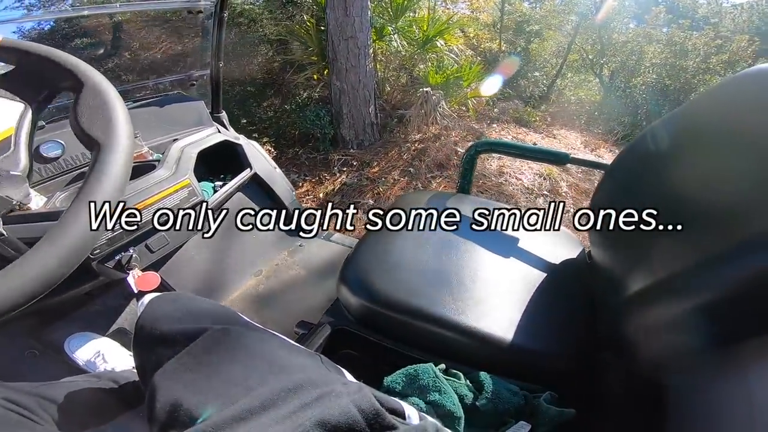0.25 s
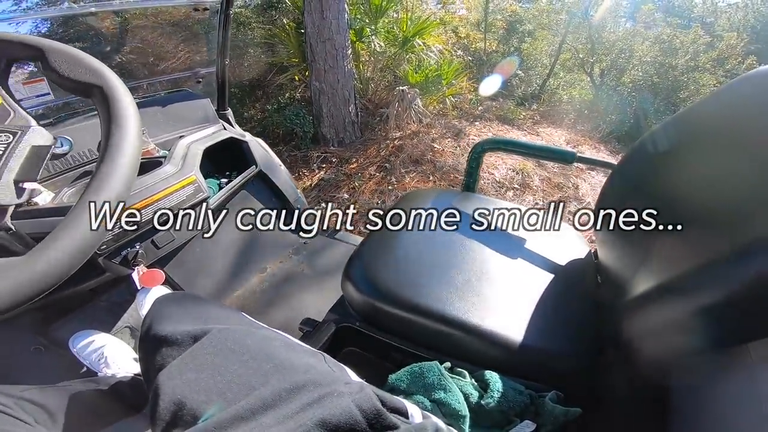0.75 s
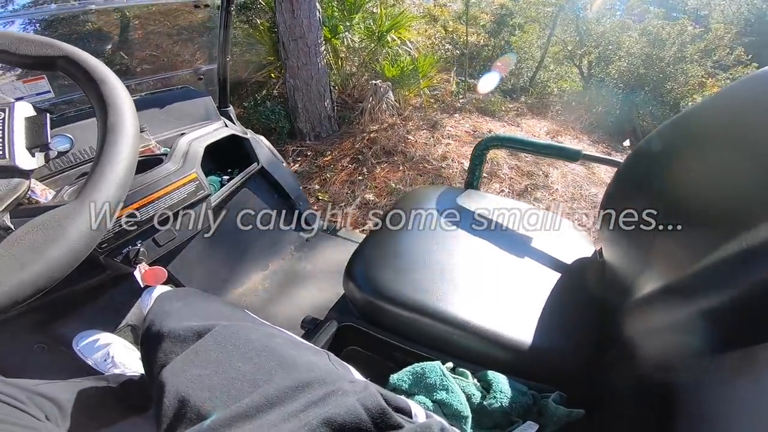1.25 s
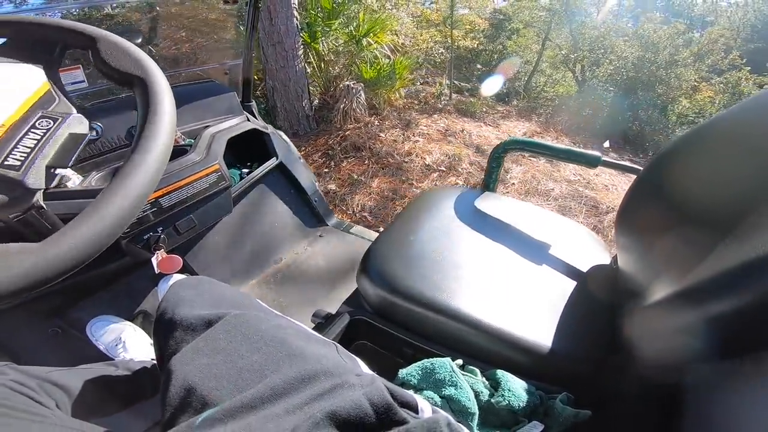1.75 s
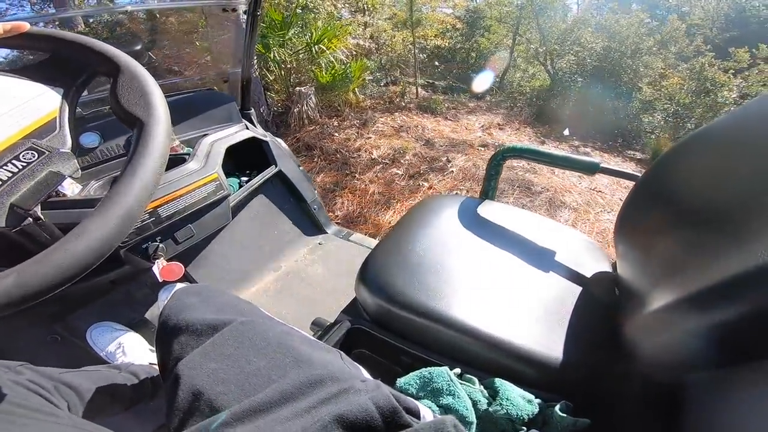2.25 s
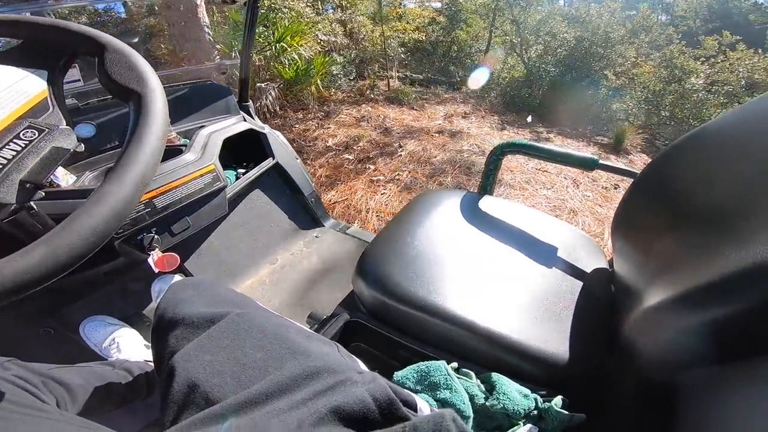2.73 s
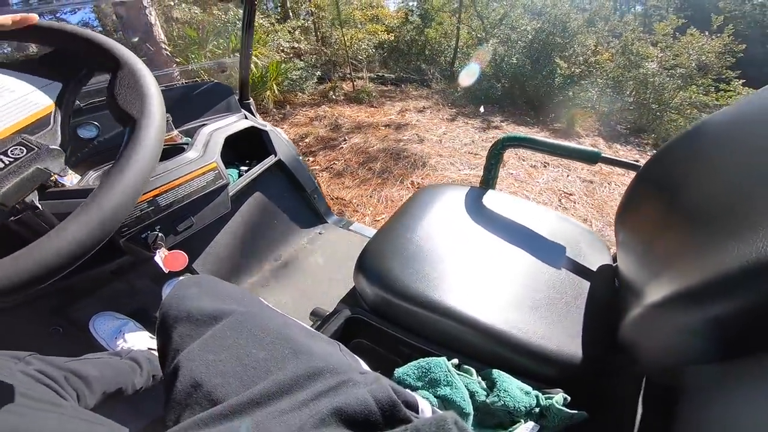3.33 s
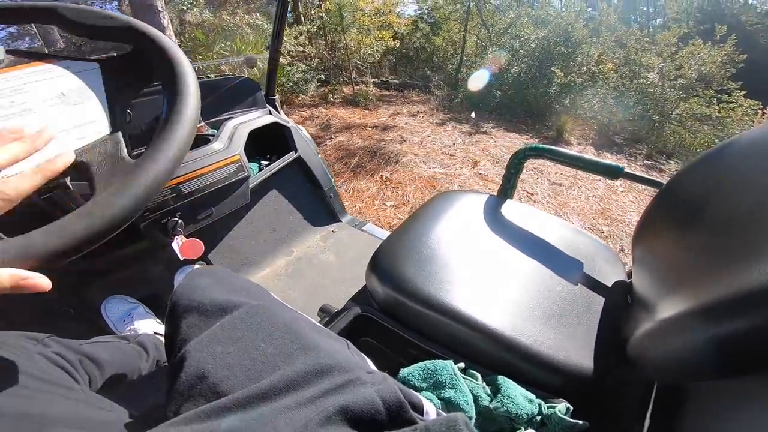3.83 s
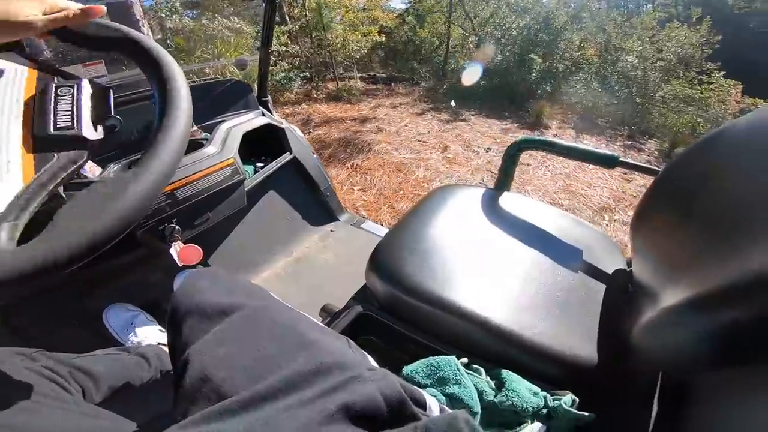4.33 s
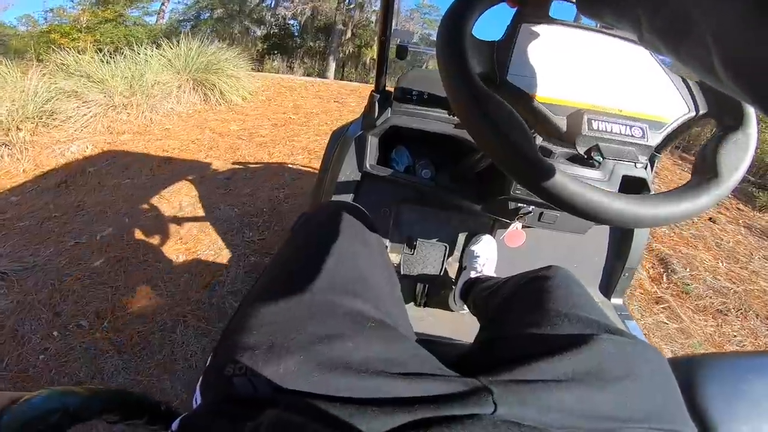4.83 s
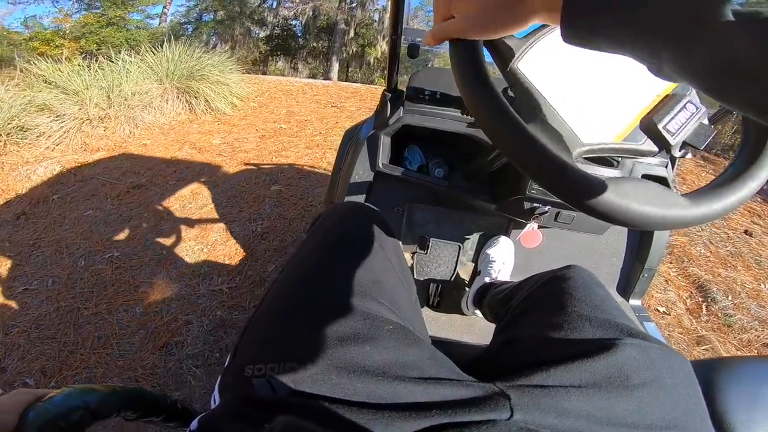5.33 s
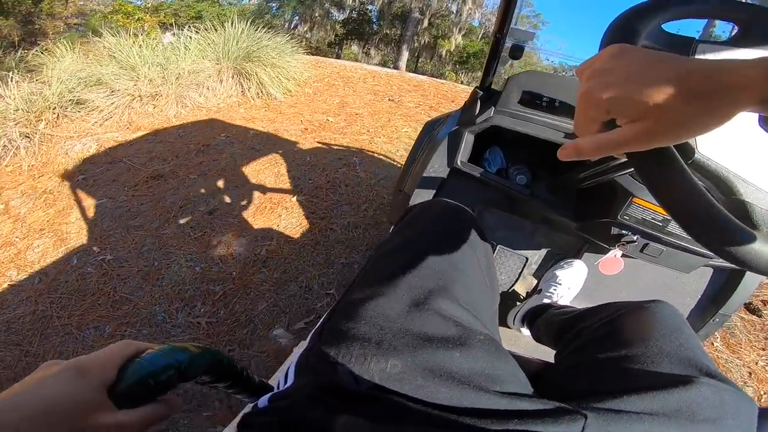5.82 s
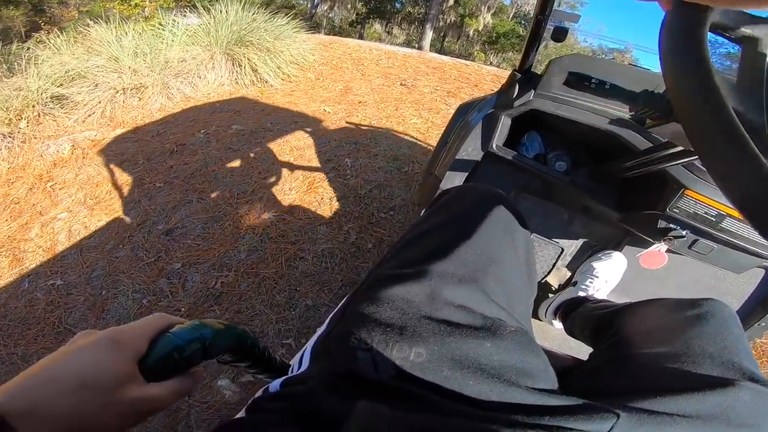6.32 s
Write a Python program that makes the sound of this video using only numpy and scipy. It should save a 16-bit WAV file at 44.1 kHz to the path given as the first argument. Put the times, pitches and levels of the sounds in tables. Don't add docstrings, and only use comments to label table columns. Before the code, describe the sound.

Outdoors in an open utility cart, heard from the driver's seat. A single-cylinder engine thumps slowly under dull valve raps and low wheel bumps. A run of quick high squeaks chirps early on, then scattered knocks, pings and one sharp metal clank. The sound fades briefly to silence and returns louder, the engine pulling fast with a raspy drone, then slowing as the throttle lifts.

```python
import sys
import numpy as np
from scipy import signal
from scipy.fft import rfft, irfft
from scipy.io import wavfile
from scipy.ndimage import uniform_filter1d

SR = 44100
rng = np.random.default_rng(int(sys.argv[2]) if len(sys.argv) > 2 else 0)


def volts(x):
    e = np.asarray(x, float) / 20
    return 10 ** e


def materialize(psi):
    bounded = np.clip(np.atleast_2d(psi).T, -1, 1)
    quanta = np.round(bounded * 32767).astype(np.int16)
    wavfile.write(sys.argv[1], SR, quanta)


N = 289737
T = np.arange(N) / SR
CUT_S = 4.549

MANNER = [
    (.5, .97, .27, .5, .27, .1),
    (.22, .26, .11, .4, .53, .18),
    (.42, .7, .0, .45, .65, .13),
]


def unit(x):
    return x / np.sqrt(np.mean(x ** 2))


def ring(x, hz, width_hz):
    return signal.lfilter(*signal.iirpeak(min(hz, .45 * SR), max(hz / width_hz, .3), fs=SR), x)


def body(x, modes):
    return sum((-1) ** k * volts(db) * ring(x, hz, width_hz) for k, (hz, width_hz, db) in enumerate(modes))


def walk(rate_hz, size=N):
    hold = max(int(SR / rate_hz), 1)
    steps = np.repeat(rng.standard_normal(size // hold + 1), hold)
    return 1.165 * uniform_filter1d(uniform_filter1d(steps, hold), hold)[:size]


def follow(table):
    return np.interp(T, *np.transpose(table))


def on_log(table, hz):
    f, v = np.transpose(table)
    return np.interp(np.log(hz), np.log(np.maximum(f, 1)), v)


def pair():
    # frequency [Hz], left-right correlation.
    likeness = [(30, 1), (60, 1), (300, 0.98), (560, 0.6), (1200, 0.026), (2500, 0.53), (5000, 0.2),
                (11000, 0.052)]
    # frequency [Hz], left minus right [dB].
    lean = [(60, 5), (110, -2), (190, 0), (340, -1.5), (610, -4.5), (1080, -4), (1920, -3.5), (3430, -2),
            (6110, -0.5), (10900, -11.5)]
    hz = np.maximum(np.arange(N // 2 + 1) * SR / N, 1)
    corr = np.clip(on_log(likeness, hz), 0, 1)
    mid, side = rfft(rng.standard_normal((2, N)))
    sign = np.array([[1], [-1]])
    ports = np.sqrt(1 + corr) * mid + sign * np.sqrt(1 - corr) * side
    return irfft(ports * volts(sign * on_log(lean, hz) / 2), N)


def shaped(spectrum, flicker_db, rate_hz):
    hz = np.maximum(np.arange(N // 2 + 1) * SR / N, 1)
    spec = rfft(pair()) * volts(on_log(spectrum, hz))
    out = 0
    for centre in np.arange(np.log2(spectrum[0][0]), np.log2(spectrum[-1][0]), .5):
        band = np.clip(1 - 2 * abs(np.log2(hz) - centre), 0, 1)
        out = out + irfft(spec * band, N) * volts(flicker_db * walk(rate_hz))
    return unit(out)


def slip(hz, partials_db, wobble, flutter_db):
    n = len(hz)
    phase = 2 * np.pi * np.cumsum(hz * (1 + wobble * walk(1000, n))) / SR
    return sum(volts(db + flutter_db * walk(170, n)) * np.sin((k + 1) * phase)
               for k, db in enumerate(partials_db))


def add(out, s, sound, pan_db):
    i = max(int(s * SR), 0)
    n = min(len(sound), N - i)
    out[:, i:i + n] += sound[:n] * volts(np.array([[pan_db], [-pan_db]]) / 2)


def shield_hum(out):
    shield = (303, 5, -41.5)
    hz, width_hz, db = shield
    hum = ring(ring(rng.standard_normal(N), hz, width_hz), hz, 52)
    add(out, 0, volts(db) * unit(hum) * (T < CUT_S), -.5)


def wheel_bumps(out):
    # start [s], peak [dB], ring [Hz], cycles to die by 60 dB.
    bumps = [(0.453, -18.5, 220, 40), (.5, -27, 22.9, 17), (0.618, -35, 102, 12), (0.826, -19, 98, 12),
             (.86, -15.5, 23, 10.4), (.907, -28, 108, 12), (1.059, -15.5, 112.6, 13), (1.173, -17, 102, 16),
             (1.917, -19.5, 116, 19), (2.22, -22, 106, 13), (2.324, -28, 102, 12), (2.85, -17, 21, 20),
             (3.111, -25, 110, 12), (3.631, -21, 97, 12), (3.747, -16, 104, 14), (4.4, -16, 110, 15),
             (2.25, -30, 287, 25), (2.63, -39, 115, 17), (4.42, -20, 268, 30)]
    t = T[:int(.4 * SR)]
    for s, db, hz, cycles in bumps:
        fall = volts(db - 60 * t * hz / cycles)
        add(out, s, fall * np.minimum(t * hz, 1) * np.sin(2 * np.pi * hz * t), -.3)


def valve_raps(out):
    # start [s], peak [dB], ring [Hz].
    raps = [(0.132, -36.5, 490), (0.29, -24.5, 404), (0.399, -28.5, 417), (0.589, -27.5, 410),
            (0.634, -22.5, 406), (0.801, -17, 470), (0.926, -18.5, 428), (1.044, -17.5, 500),
            (1.149, -23, 452), (1.277, -22, 406), (1.384, -22, 474), (1.493, -24.5, 470), (1.587, -22, 516),
            (1.691, -26.5, 503), (1.741, -35, 400), (1.794, -25.5, 404), (1.897, -24, 510),
            (2.085, -24.5, 430), (2.266, -37, 405), (2.45, -34.5, 431), (2.559, -41, 538),
            (2.611, -17, 508), (2.707, -31, 506), (2.806, -22, 405), (2.894, -26, 517), (3.223, -24, 405),
            (3.33, -32, 390), (3.38, -23, 533), (3.436, -28.5, 433), (3.496, -39.5, 390), (3.65, -36, 420),
            (3.739, -28, 436), (3.951, -33.5, 390), (4.073, -26.5, 450), (4.229, -35, 404)]
    # frequency [Hz], width [Hz], level [dB].
    cover = (879, 41, -6)
    cover_hz, cover_width_hz, cover_db = cover
    t = T[:int(.12 * SR)]
    seat = signal.butter(3, 1200, fs=SR, output="sos")
    for s, db, hz in raps:
        chatter = rng.standard_normal(len(t)) * np.minimum(t / 0.0028, 1) * volts(-60 * t / .09)
        rap = ring(chatter, hz, 56) + 0.46 * ring(chatter, 499, 35)
        rap = rap + volts(cover_db) * ring(chatter, cover_hz, cover_width_hz)
        rap = signal.sosfilt(seat, rap)
        add(out, s, volts(db - 3) * rap / abs(rap).max(), -7.5)


def mount_sings(out):
    # time just before the swell's peak [s], peak [dB], frequency [Hz].
    sings = [(1.563, -49, 5450), (1.683, -39.5, 5340), (1.746, -50, 5400), (1.796, -45, 5410),
             (1.846, -39.5, 5320), (1.887, -41.5, 5480), (1.91, -52, 5300), (1.994, -31.5, 5380),
             (2.03, -54, 5400)]
    lead_s, rise_s = 0.0088, 0.0088
    t = T[:int(.12 * SR)]
    for s, db, hz in sings:
        swell = np.exp(-.5 * (t / rise_s - 2) ** 2)
        add(out, s - lead_s, volts(db) * swell * slip(hz + 0 * t, (0, -17), .01, 3.5), -1.5)


def dull_knocks(out):
    # start [s], peak [dB], ring [Hz], left minus right [dB].
    hits = [(0.444, -22.5, 689, -3), (1.275, -29.5, 700, -5), (2.29, -29.5, 700, -5), (2.62, -26, 848, -4),
            (0.819, -30, 482, -9), (1.044, -26.5, 595, 3), (1.954, -17.5, 709, 0), (2.299, -33, 457, -3),
            (2.988, -17, 689, -3), (3.608, -28, 700, -1), (3.801, -18, 652, -4), (4.37, -28, 840, -16),
            (4.394, -22, 399, -1), (4.429, -27, 426, -3), (4.774, -27, 613, -1), (4.819, -27, 450, -4),
            (5.409, -20, 560, 4), (5.45, -26, 570, -7), (6.152, -39, 950, -2), (6.16, -24.5, 479, -4),
            (6.235, -21, 513, -3), (6.499, -22, 523, -5), (6.361, -20, 486, -3), (6.41, -37, 520, -2)]
    cycles_to_die, crack_db = 43, -16
    t = T[:int(.2 * SR)]
    for s, db, hz, pan_db in hits:
        blow = np.minimum(t / 0.0017, 1) * volts(-60 * (t * hz / cycles_to_die) ** 1.76)
        chatter = rng.standard_normal(len(t)) * blow
        dull = ring(chatter, hz, 320) + .3 * ring(chatter, 1.8 * hz, 500) + .5 * ring(chatter, 240, 80)
        dull = ring(dull, hz, 1500)
        panel = blow * slip(hz + 0 * t, (-8, -18), .1, 3.0)
        dull = dull / abs(dull).max() + panel
        crack = ring(ring(chatter * np.exp(-t / 0.018), 1900, 3500), 2800, 6000)
        knock = dull / abs(dull).max() + volts(crack_db) * crack / abs(crack).max()
        add(out, s, volts(db) * knock, pan_db)


def ticks_and_pings(out):
    # start [s], peak [dB], centre [Hz], left minus right [dB].
    ticks = [(0.4365, -39, 7000, -9), (2.2902, -41.5, 8000, -7), (2.294, -36, 2700, -2),
             (3.603, -33, 2651, -6), (3.715, -23, 2420, 1), (3.7948, -32.5, 2680, -8),
             (4.3315, -35.5, 2770, -11), (4.3647, -37, 2410, 2), (5.2595, -39, 2550, 6),
             (5.3082, -30, 2610, -2), (5.5897, -35, 2870, 2), (6.1694, -37, 3240, -7),
             (6.4333, -32, 2710, 0)]
    # start [s], peak [dB], centre [Hz], left minus right [dB].
    pings = [(0.704, -36, 4500, 0), (1.79, -40, 4700, 0), (1.9173, -35, 4070, -0.6), (2.356, -37, 5360, -1),
             (3.3988, -35, 5400, -3), (3.4457, -35, 4300, 1), (5.978, -38, 4700, 1), (6.309, -38, 6350, -1)]
    t = T[:int(.2 * SR)]
    for events, width_hz, t60_s in ((ticks, 3150, 0.081), (pings, 610, 0.051)):
        for s, db, hz, pan_db in events:
            tick = ring(ring(rng.standard_normal(len(t)), hz, width_hz), hz, 2 * width_hz)
            tick = tick * np.minimum(t / 0.002, 1) * volts(-60 * t / t60_s)
            add(out, s, volts(db) * tick / abs(tick).max(), pan_db)


def metal_clank(out):
    # start [s], peak [dB], rattle [s], T60 [s].
    clanks = [(3.1385, -9.5, .011, .09)]
    # frequency [Hz], width [Hz], level [dB].
    modes = [(700, 320, -4.5), (1690, 320, -6), (2450, 350, -1), (4220, 510, 0.5), (6470, 790, -1),
             (8600, 5100, -9), (12900, 6500, -16)]
    t = T[:int(.2 * SR)]
    for s, db, rattle_s, t60_s in clanks:
        fall_db = -60 * np.maximum(t - rattle_s, 0) / t60_s
        clank = body(rng.standard_normal(len(t)) * volts(fall_db + 3.0 * walk(400, len(t))), modes)
        add(out, s, volts(db) * clank / abs(clank).max(), -.5)


def mount_creak(out):
    # time [s], level [dB], slip rate [Hz].
    glide = [(.68, -45, 624), (.712, -27.5, 632), (.742, -29, 621), (.765, -42, 624)]
    partials_db = (-10, 1.5, -8.5, -5.5, -26, -19, -20, -29, -21)
    s, db, hz = np.transpose(glide)
    t = np.arange(s[0] - .01, s[-1] + 0.035, 1 / SR)
    tone = slip(np.interp(t, s, hz), partials_db, .022, 3.0)
    scrape = volts(-12) * ring(rng.standard_normal(len(t)), 4600, 6000)
    edge = np.clip(np.minimum(t - t[0], t[-1] - t) / 0.02, 0, 1)
    add(out, t[0], edge * volts(np.interp(t, s, db)) * (tone + scrape), -1.5)


def mount_squeaks(out):
    # start [s], peak [dB], pitch [Hz], third partial [dB].
    run = [(0.814, -22.5, 2710, -13.5), (0.8784, -23, 2597, -3.5), (0.9425, -19, 2700, -10),
           (1.0074, -20, 2677, -5.5), (1.0685, -20.5, 2617, -5), (1.1296, -24.5, 2700, -8.5),
           (1.1826, -19.5, 2587, -11.5), (1.219, -21, 2445, 2.5), (1.282, -21.5, 2477, 0),
           (1.3338, -20.5, 2458, 3.5), (1.3962, -28, 2720, -16), (1.4437, -21.5, 2493, 2.5),
           (1.5125, -28, 2670, -13), (1.555, -24, 2730, -16), (1.6541, -21.5, 2757, -12.5),
           (1.7152, -22, 2726, -13), (1.761, -26.5, 2750, -15), (1.8153, -24, 2733, -15),
           (1.8687, -24.5, 2720, -14), (1.959, -21, 2696, -11), (2.0098, -30, 2720, -10)]
    # start [s], peak [dB], pitch [Hz], third partial [dB].
    strays = [(0.0014, -23, 2447, 1), (0.146, -33, 2420, -9), (0.725, -30.5, 2870, -24),
              (.75, -33, 2780, -14), (3.044, -23.5, 2450, -2.5), (3.563, -30.5, 2600, -29),
              (3.62, -26.5, 2640, -24), (3.975, -29, 2450, -9), (4.032, -30, 2650, -12.5),
              (4.297, -30.5, 2660, -14), (4.444, -28, 2425, -0.5), (4.529, -27, 2360, -11),
              (4.574, -24.5, 2450, -20), (5.123, -34, 2550, -27), (5.172, -30, 2630, -27),
              (5.208, -31.5, 2830, -23), (5.262, -29, 2440, -25), (5.285, -30, 2520, -15),
              (5.3085, -21, 2650, -14.5), (5.326, -28, 2660, -17), (5.396, -20.5, 2780, -27)]
    top_db = (-12, -11, -12)
    tail_partials_db = (15, 8.5, -8, -22, -10)
    catch_share, catch_s = .03, .012
    tail_db, tail_t60_s = -19, .2
    t = T[:int(.16 * SR)]
    for k, (s, db, hz, third_db) in enumerate(run + strays):
        in_run = k < len(run)
        t60_s = min(0.048 + 4 * max(-25.0 - db, 0), 0.055) if in_run else 0.046
        second_db = -3 - third_db ** 2 / 24
        scrape = np.clip((hz - 2500) / 120, 0, 1)
        wobble = .015 + .038 * scrape * np.exp(-t / .024)
        wobble = wobble + .035 * (s > CUT_S)
        pitch_hz = hz * (1 - catch_share * scrape * np.exp(-t / catch_s))
        upper_db = third_db / 2 + scrape + np.array(top_db)
        tone = slip(pitch_hz, (0, second_db, third_db, *upper_db), wobble, 3.4)
        sound = tone * np.minimum(t / (0.00056 + 0.001 * scrape), 1) * volts(-60 * (t / t60_s) ** 3.2)
        if in_run:
            fall = np.minimum(t / 0.0076, 1) * volts(tail_db - 60 * t / tail_t60_s)
            sound = sound + fall * slip(hz + 0 * t, tail_partials_db, 0.0054, 3.0)
        add(out, s, volts(db - 8.5) * sound, -3.0)


def housing(loose):
    loose[0] = np.roll(loose[0], shift=1)
    return np.array([signal.sosfilt(signal.butter(4, hz, fs=SR, output="sos"), port)
                     for hz, port in zip((8000, 9000), loose)])


def cab_echo(loose):
    t60_s, level_db = .05, -5
    t = T[:int(.2 * SR)]
    echo = rng.standard_normal((2, len(t))) * volts(-60 * t / t60_s) * (t > .002)
    echo = echo / np.sqrt((echo ** 2).sum(axis=1, keepdims=True))
    return volts(level_db) * signal.fftconvolve(loose, echo, axes=1)[:, :N]


def by_load(load, rows):
    return np.array([np.interp(load, (0, 1, 2), column) for column in np.transpose(rows)])


def crank():
    # time [s], firing rate [Hz].
    firing = [
        [(0, 8.0), (.6, 8.2), (1.0, 8.8), (1.3, 9.0), (1.95, 10.1), (2.25, 9.75), (2.55, 9.7), (2.95, 10.7),
         (3.85, 8.55), (4.54, 8.0)],
        [(4.55, 19.06), (4.853, 20.12), (5.156, 20.86), (5.459, 21.45), (5.661, 20.84), (5.762, 19.56),
         (5.863, 17.2), (5.964, 16.19), (6.2, 14.45), (6.57, 14.45)],
    ]
    lift_off_s = (5.7, 5.8)
    second = T >= CUT_S
    hz = follow(firing[0] + firing[1])
    phase = np.where(second, np.cumsum(hz * second), np.cumsum(hz)) / SR
    load = np.where(second, 1 + np.interp(T, lift_off_s, (0, 1)), 0)
    return hz, phase, load


def layer_levels(hz, load):
    # time [s], engine effort [dB].
    effort = [
        [(0, -4.5), (.4, -4.5), (.62, 2), (.72, -3), (.77, -6), (.82, 4), (1.1, 0.25), (3.65, -1.5), (4.06, -4),
         (4.46, 0)],
        [(4.62, 7), (4.67, 9), (5.3, 9.5), (5.69, 6.5), (5.78, 3), (6.07, 3.5), (6.4, 7), (6.57, 9.5)],
    ]
    # thump, exhaust bark, body noise, hiss [dB].
    layers_db = [
        (-25.5, -40, -37, -49),
        (-24, -27.5, -30, -48.5),
        (-24.5, -34, -32, -49),
    ]
    follows = (0.98, 0.83, 0.3, 0.48)
    # usual firing rate [Hz], noise gain per octave above it [dB].
    revs = [
        (9.4, 1),
        (19.9, 22.5),
        (15.6, 1),
    ]
    # time [s], bark gained [dB].
    jolts = [(.15, -2.5), (.33, -3), (.82, 5.5), (1.08, 5.5), (1.5, -1), (1.87, 4.5), (2.25, 6.5), (3.2, 8),
             (4.11, -5), (4.4, 11.5), (6.07, -1.5), (6.4, 0), (6.57, 0)]
    rise_s, fall_s = 0.081, 0.057
    second = T >= CUT_S
    effort_db = np.where(second, follow(effort[1]), follow(effort[0]))
    thump_db, bark_db, body_db, hiss_db = by_load(load, layers_db) + np.outer(follows, effort_db)
    usual_hz, octave_db = by_load(load, revs)
    revs_db = octave_db * np.log2(np.where(second, hz, np.minimum(hz, 11)) / usual_hz)
    coarse = T[::44]
    jolt_db = sum(db * np.exp(-np.maximum((s - coarse) / rise_s, (coarse - s) / fall_s)) for s, db in jolts)
    jolt_db = np.interp(T, coarse, jolt_db)
    return thump_db, bark_db + jolt_db, body_db + revs_db + 0.44 * jolt_db, hiss_db + revs_db


def orders(phase, first, levels_db, lag, spread, wander):
    port_turn = .11
    step = 8
    phase, levels_db, lag = phase[::step], levels_db[::step], (lag + 0 * T)[::step]
    out, top = 0, uniform_filter1d(1. * levels_db.argmax(axis=1), size=500)
    for k, db in enumerate(levels_db.T):
        turns = (first + k) * (phase - lag) - spread * (k - top) ** 2 / 2
        angle = 2 * np.pi * turns + wander * walk(7 * step, len(phase)) + port_turn * np.array([[1], [-1]])
        out = out - volts(db + 1.5 * walk(6 * step, len(phase))) * np.cos(angle)
    out = out / np.sqrt((volts(levels_db) ** 2).sum(axis=1) / 2)
    return signal.resample_poly(out, step, 1, axis=1)[:, :N]


def pan_thump(phase, load, noise):
    levels_db = [
        (-40, -9, -20, -18, -6, 0, -9, -17, -17, -14),
        (-13, -2, 0, -5, -4, -12, -13, -22, -27, -24),
        (-40, -8, -9, -1, 0, -4, -11, -16, -15, -23),
    ]
    # frequency [Hz], width [Hz], level [dB].
    modes = [(21.7, 19, 2.5), (45.6, 76, -20), (65.2, 68, -2), (93, 11, -10.5), (103.8, 17.6, 0),
             (137, 113, -3.5)]
    # time [s],
    # level [dB].
    drone = [(0, -1), (.8, -12.5), (1.05, -2.5), (3.85, 1.5), (4.0, -2.5), (4.54, -9), (4.55, 0),
             (6.57, -1)]
    rumble = by_load(load, MANNER)[0]
    clean = orders(phase, 1, by_load(load, levels_db).T, .08, .14, .3)
    clean = volts(follow(drone)) * np.sqrt(1 - rumble ** 2) * clean
    return clean + rumble * unit(ring(body(noise, modes), 71.0, 60))


def exhaust_bark(phase, load, noise):
    levels_db = [
        (0, -5, -9, -14, -16, -20, -18, -18, -18) + (-30,) * 11,
        (-24, -10, 0, -1, -4, -12, -11, -15, -19, -17, -15, -16, -20, -17, -20, -19, -21, -18, -14, -14),
        (-14, -15, -17, -14, -20, -7, 0, -8, -5) + (-22,) * 11,
    ]
    # frequency [Hz], width [Hz], level [dB].
    modes = [(217.4, 48, 5), (264.7, 19.6, 5), (296.4, 13, -5), (350, 13, -10.5)]
    _, rasp, pipe_lag, *_ = by_load(load, MANNER)
    clean = np.sqrt(1 - rasp ** 2) * orders(phase, 11, by_load(load, levels_db).T, pipe_lag - .1, .05, .5)
    return clean + rasp * unit(ring(body(noise, modes), 282.3, 76) * volts(2.0 * walk(12)))


def strokes(phase, load):
    shut = [
        (.4, .07),
        (.5, .1),
        (2.0, .12),
    ]
    _, _, _, depth, stroke, width = by_load(load, MANNER)
    cycle = np.floor(phase - stroke + .5).astype(int)
    off = phase - stroke - cycle
    clack_gain, clack_width = by_load(load, shut)
    clack = clack_gain * volts(1.4 * rng.standard_normal(80))[cycle % 80]
    clack = clack * np.exp(-.5 * (off / clack_width) ** 2)
    off = np.where(T >= CUT_S, off, (off + 0.33) % .5 - .25)
    puff = volts(1.5 * rng.standard_normal(80))[cycle % 80] * np.exp(-.5 * (off / width) ** 2)
    gate = uniform_filter1d(1 - depth + 2 * depth * puff, size=200)
    return puff, clack, gate


def intake_gas(load, noise, puff, clack, gate):
    # frequency [Hz], density [dB per Hz].
    spectrum = [(210, -1.5), (350, 0.5), (391, -7.5), (610, -4.5), (765, -9), (883, -2.5), (1720, -23),
                (1850, -18), (3200, -51), (4160, -30), (7040, -120)]
    # frequency [Hz], width [Hz], level [dB].
    modes = [(408.7, 15.3, 7), (536, 92, -5.5), (597, 130, -9.5), (1423, 97, -14), (1897, 144, -14.5)]
    intake_db = [
        -5.5,
        -10.5,
        -10,
    ]
    # time [s], pitch [Hz], level against the body noise [dB].
    horn = [(0, 918, -8), (4.5, 915, -11), (5.7, 900, -11), (5.88, 890, -7), (6.1, 940, -12),
            (6.14, 982, 0), (6.57, 982, 0)]
    intake = unit(body(noise * (gate ** 0.1 + clack), modes))
    intake = volts(np.interp(load, (0, 1, 2), intake_db)) * intake
    intake = signal.sosfilt(signal.butter(3, 2600, fs=SR, output="sos"), intake)
    s, horn_hz, horn_db = np.transpose(horn)
    throat = slip(np.interp(T, s, horn_hz), (0,), .018, 1.5) * (.08 + puff + .2 * clack)
    throat = volts(np.interp(T, s, horn_db) + np.array([[-2], [2]])) * throat
    return shaped(spectrum, 2.7, 9.2) * unit(gate) ** 0.18 + intake + throat


def tailpipe_hiss(phase, load, hiss_db, gate):
    # frequency [Hz], density [dB per Hz].
    hiss_spectrum = [(1470, 1), (2500, -1), (2930, -0.5), (3430, -4.5), (4250, -10), (5760, -13),
                     (6210, -14), (7280, -13.5), (7800, -17), (8420, -26.5), (11300, -49.5), (14700, -75),
                     (22000, -120)]
    # frequency [Hz], density [dB per Hz].
    air_spectrum = [(6000, -22), (8500, -3), (10500, -8), (11500, -16), (14000, -18), (15500, -43),
                    (22000, -60)]
    # swing [dB], lag [cycles], top air against hiss [dB].
    jet = [
        (-0.5, 0.63, -22.5),
        (1.06, 0.67, -16.5),
        (0.9, 0.87, -18),
    ]
    swing_db, lag, air_db = by_load(load, jet)
    blow = np.cos(2 * np.pi * (phase - lag))
    hiss = volts(hiss_db + 4.5) * shaped(hiss_spectrum, 2.44, 18) * unit(gate) ** 0.42
    spit_db = 2 * swing_db * blow * (1.5 + .4 * walk(14))
    air = volts(hiss_db + air_db + spit_db) * shaped(air_spectrum, 1.5, 25)
    return hiss * volts(swing_db * blow) + air


def engine():
    hz, phase, load = crank()
    thump_db, bark_db, body_db, hiss_db = layer_levels(hz, load)
    puff, clack, gate = strokes(phase, load)
    noise = pair()
    out = volts(thump_db) * pan_thump(phase, load, noise)
    out = out + volts(bark_db) * exhaust_bark(phase, load, noise)
    out = out + volts(body_db) * intake_gas(load, noise, puff, clack, gate)
    return out + tailpipe_hiss(phase, load, hiss_db, gate)


def scene():
    loose = np.zeros((2, N))
    for source in (dull_knocks, ticks_and_pings, metal_clank, mount_creak, mount_squeaks):
        source(loose)
    loose = housing(loose)
    loose = loose + cab_echo(loose)
    for source in (shield_hum, wheel_bumps, valve_raps, mount_sings):
        source(loose)
    return engine() + loose


def band_limit(x):
    return signal.sosfilt(signal.butter(12, 14900, fs=SR, output="sos"), x)


def record(dry):
    # time [s], gain.
    fade = [
        (4.463, 1),
        (4.549, 0),
        (4.623, 0.75),
    ]
    mix = dry * follow(fade)
    mix = signal.sosfilt(signal.butter(2, 14, "high", fs=SR, output="sos"), mix)
    return band_limit(mix)


dry = scene()
out = record(dry)
materialize(out)
```